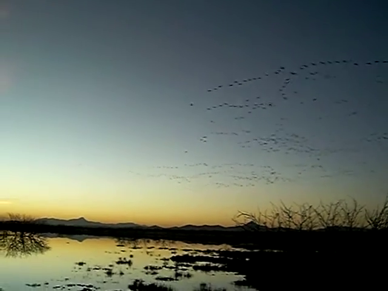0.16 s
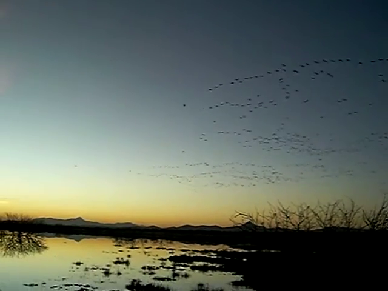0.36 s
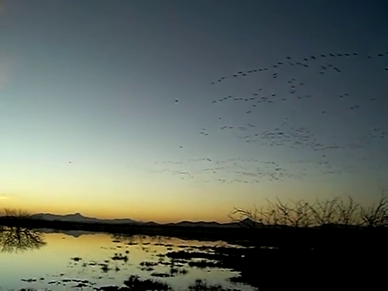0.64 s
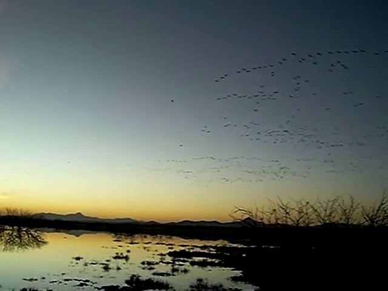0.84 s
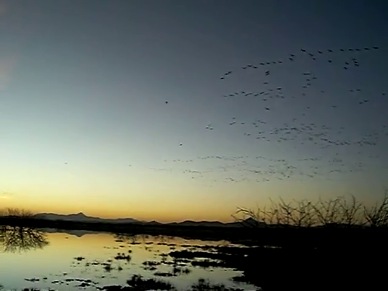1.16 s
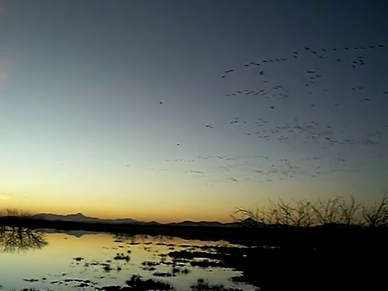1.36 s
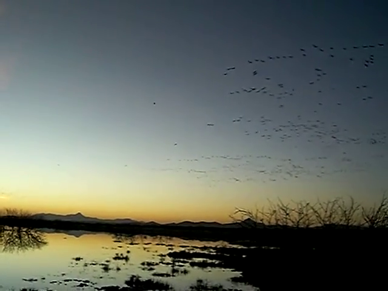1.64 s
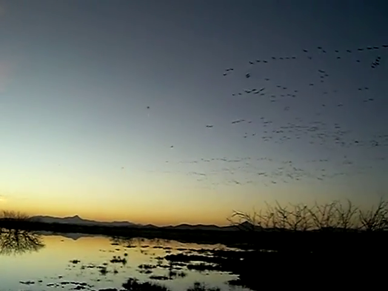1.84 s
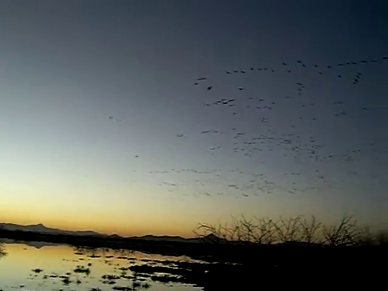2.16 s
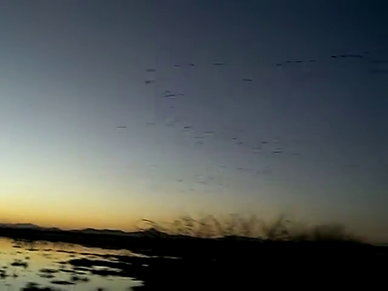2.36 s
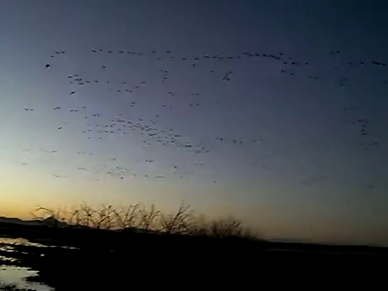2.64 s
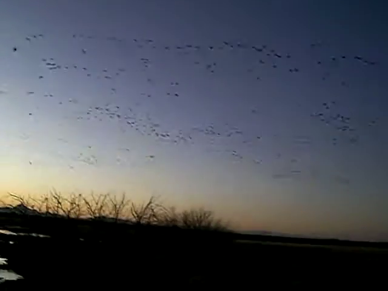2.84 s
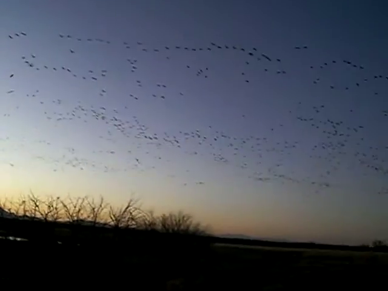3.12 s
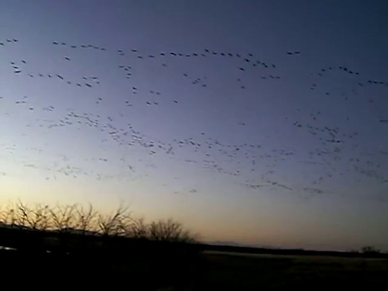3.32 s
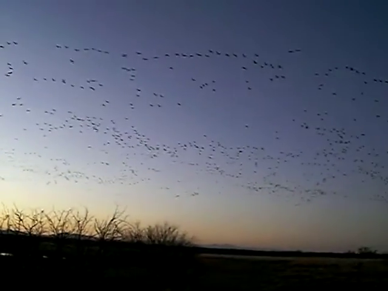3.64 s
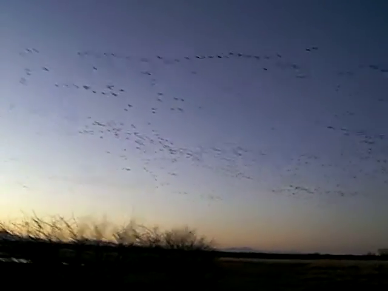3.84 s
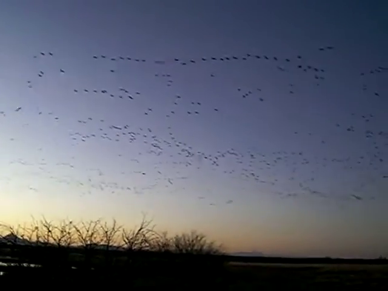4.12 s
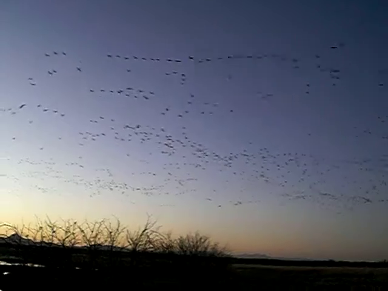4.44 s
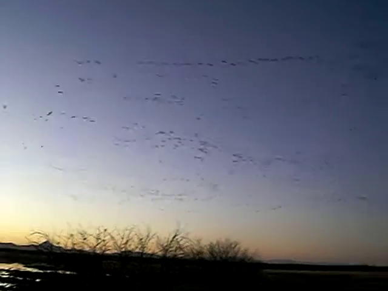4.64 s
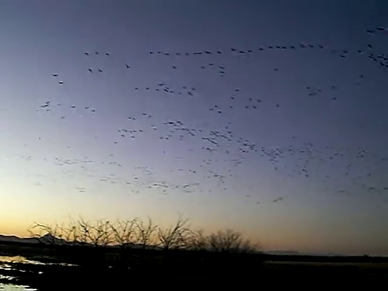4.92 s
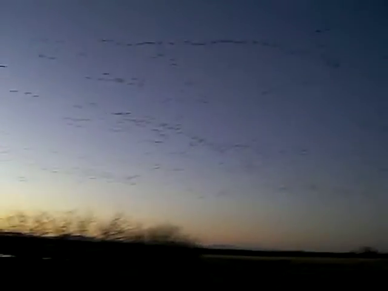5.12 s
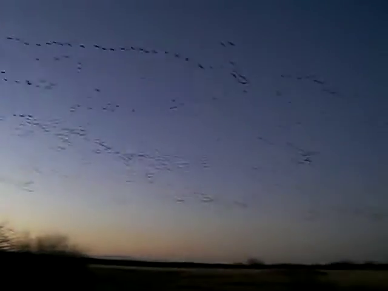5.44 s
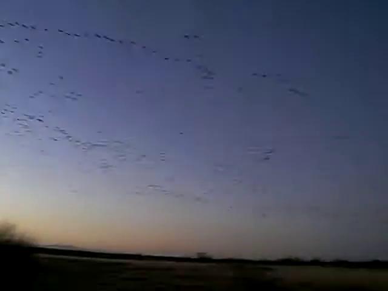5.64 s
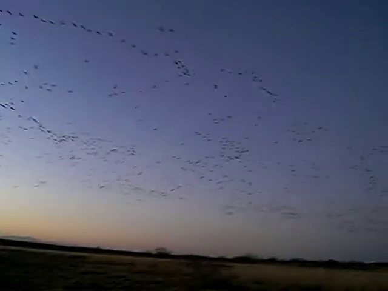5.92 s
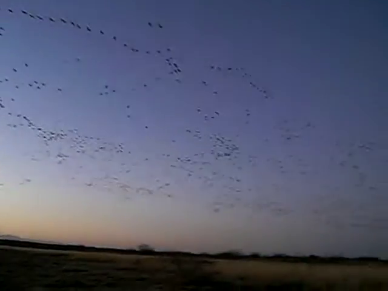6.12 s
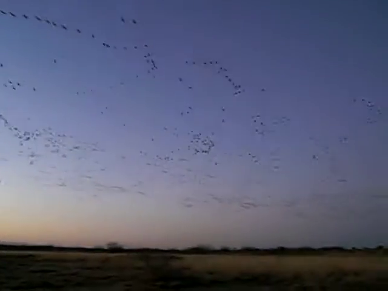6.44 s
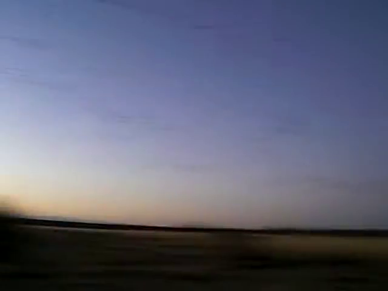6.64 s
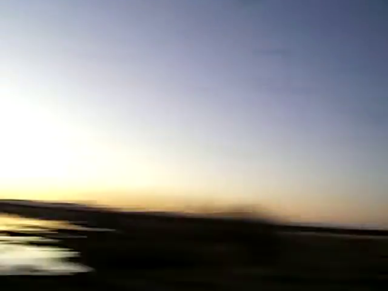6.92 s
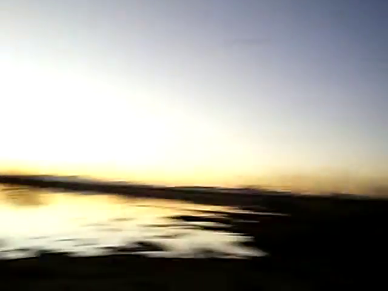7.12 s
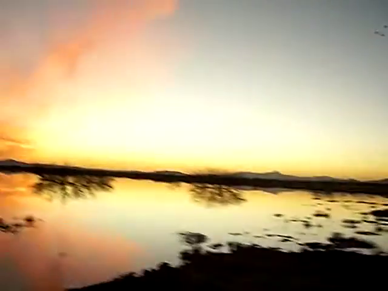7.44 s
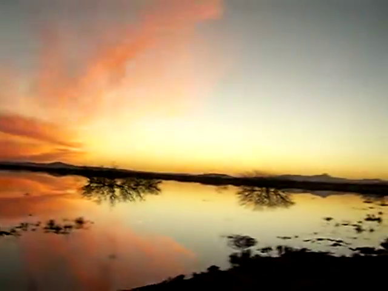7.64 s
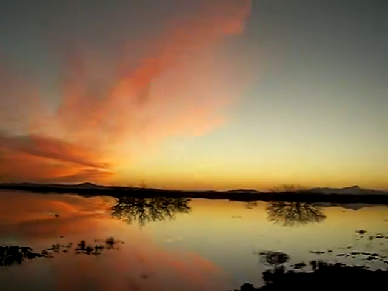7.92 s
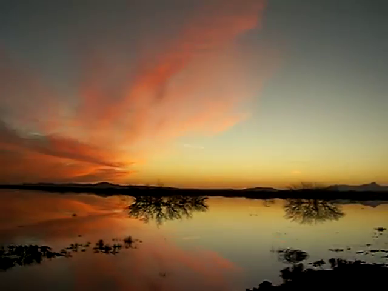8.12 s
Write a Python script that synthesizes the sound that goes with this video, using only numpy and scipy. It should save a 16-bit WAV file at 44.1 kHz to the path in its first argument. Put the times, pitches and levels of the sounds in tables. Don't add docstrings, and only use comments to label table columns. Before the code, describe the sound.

Dense, unbroken bird clamour in open air with no echo: mid-pitched rolling bugles and honks overlapping at many distances, gently swelling and brightening. Single calls rise just above the mass. A small mono handheld microphone lends faint fizz, low rumble and a thin high whine. Late on, fingers rub its case, click sharply once and bump it several times.

```python
import sys
import numpy as np
from scipy import signal
from scipy.fft import rfft, irfft, next_fast_len
from scipy.io import wavfile
from scipy.ndimage import uniform_filter1d, map_coordinates

SR = 44100
rng = np.random.default_rng(int(sys.argv[2]) if len(sys.argv) > 2 else 0)


def linear_from_db(decibels):
    return 10 ** (np.asarray(decibels, float) / 20)


def unload_audio(sound):
    columns = np.transpose(np.atleast_2d(sound))
    steps = np.round(np.clip(columns, -1, 1) * 32767)
    wavfile.write(sys.argv[1], SR, steps.astype(np.int16))


N = 364707

# f/Hz, level/dB per Hz
HISS_COLOUR = [(3500, -6), (6000, -2), (7400, -1.5), (8800, -2), (10200, -1.5), (11800, -3), (13000, -2),
               (14700, -1), (15700, -2)]
# f/Hz, level/dB per Hz
RUMBLE_COLOUR = [(12, -42), (20, -4.5), (43, -19), (62, -8.5), (103, -2.5), (135, -7), (323, -10),
                 (520, -5.5), (680, -27.5), (1140, -120)]
# f/Hz, width/Hz, depth/0-1
PORT_HOLLOWS = [(4730, 260, .8), (7900, 200, .6), (9380, 350, .55), (14100, 200, .5)]
# t/s, level/dB
TICKS = [
    (.0272, -56),
    (.0338, -55),
]
# f/Hz, level/dB, t60/s
TICK_RING = [
    (14130, 5, 0.007),
    (10830, -5, 0.005),
]
# t/s, peak level/dB, direction/+-1, ring f/Hz, width/s
KNOCKS = [(0.404, -40, 1, 302, 0.0013), (2.0722, -39, 1, 330, 0.0021), (4.725, -48, 1, 300, .003),
          (5.369, -42, -1, 129, 0.0042), (6.331, -45, 1, 199, 0.0021), (6.638, -30, 1, 340, 0.0029),
          (6.853, -44, -1, 89, .005), (6.96, -52, 1, 6800, .001), (7.083, -32, -1, 150, 0.0014),
          (7.084, -46, 1, 6500, .0012), (7.304, -19, 1, 60, 0.0011), (7.598, -36, 1, 60, 0.002),
          (7.6315, -22, 1, 60, 0.00092), (7.827, -34, 1, 60, 0.003), (7.847, -32.5, -1, 60, 0.00087)]
# t/s, level/dB, rise/s, t60/s
RUBS = [(4.7255, -46, .001, 0.011), (5.735, -52.5, .015, 0.12), (6.04, -55, 0.044, .15),
        (6.2, -65, .03, .15), (6.606, -44.5, .004, 0.03), (6.634, -55, .002, 0.0154),
        (6.772, -51, .006, .03), (6.232, -50, .002, .02), (6.853, -47, .002, .02), (6.942, -49, .002, .02),
        (7.024, -45, .007, 0.034), (7.082, -52, .001, .015)]
# t/s, level/dB, tail level/dB, tail t60/s
CLICK = (6.844, 1.5, -25, .01)
# f/Hz, level/dB per Hz
CASE_COLOUR = [(2500, -22), (4000, -8), (6000, -3), (8300, 0), (10000, -4), (11800, 1), (13500, -4),
               (15400, 3), (17000, -2)]
# t/s, highest pitch f/Hz
KEENEST = [(0, 1460), (1.6, 1450), (2.2, 1386), (3.3, 1360), (4.3, 1332), (4.9, 1453), (6.2, 1401),
           (6.9, 1240), (7.5, 1180), (8.27, 1278)]
# t/s, level/dB, nearness/dB gained at the bright edge
DIN_SWELL = [(0, -24, 1), (1.01, -25, 0), (1.5, -24, 2), (1.91, -25, 0), (2.3, -25, 1.5), (2.6, -22.5, 1),
             (2.85, -24, -0.5), (3.27, -23, 0), (3.62, -23.5, -2), (4.03, -22, 0), (4.3, -24.5, 1.5),
             (5.0, -22.5, 1.5), (5.5, -23.5, -2.5), (6.2, -23, 0.5), (6.5, -25, -2.5), (6.96, -24.5, 2),
             (7.56, -26, -0.5), (8.27, -25.5, -1)]
# t/s, length/s, pitch f/Hz, level/dB over the din, favoured overtone
ROLLING_CALLS = [(0, 0.226, 1260, 1.5, 1), (0, .131, 1427, 3, 1), (.373, 0.3, 1387, -6, 1),
                 (.395, 0.092, 762, -2.5, 1), (.638, 0.19, 1355, 7, 1.53), (.25, .2, 831, -4, 1),
                 (1.312, 0.26, 989, 0.5, 2), (1.435, .356, 1362, -2, 1), (2.428, 0.16, 788, -1.5, 2),
                 (2.598, .304, 839, -11, 1), (2.751, 0.096, 1500, 1, 1), (2.867, 0.108, 856, -5, 1),
                 (3.095, 0.061, 1180, 4.5, 1), (3.097, 0.132, 1109, -1.5, 1), (3.518, 0.085, 1132, -5, 1),
                 (3.742, 0.135, 1422, -2.5, 1), (3.822, 0.105, 845, -1, 2), (4.65, 0.155, 1366, 1, 1),
                 (4.975, 0.238, 1281, 1, 1), (5.519, 0.25, 1225, -2, 1), (6.153, .311, 1200, -4, 1),
                 (6.2, 0.087, 1222, 3, 1), (6.332, .12, 1243, 1, 2), (6.829, 0.243, 842, 1.5, 2)]
# t/s, length/s, pitch f/Hz, level/dB over the din
FACING_CALLS = [(.103, .105, 1304, -2), (1.021, 0.196, 1325, 2), (1.494, .15, 1199, -1),
                (1.694, 0.17, 1312, 3), (1.78, .111, 1120, 5), (2.304, 0.234, 999, -7),
                (2.342, .167, 1267, -2.5), (2.469, .333, 1172, -2), (3.131, .179, 1317, 1),
                (3.9, .14, 1071, -2.4), (4.023, .127, 744, -8), (4.11, 0.077, 1047, 2),
                (4.341, 0.082, 1160, -9), (4.405, 0.133, 1095, 2), (4.634, 0.095, 1176, -5),
                (4.699, .317, 1277, -2.8), (4.836, 0.044, 1457, 6), (4.877, 0.092, 1122, -3),
                (4.926, 0.11, 1136, -2), (5.039, 0.14, 1315, 2), (5.058, .138, 951, 7),
                (5.328, 0.134, 1411, 2), (5.928, 0.158, 1098, 1), (6.027, 0.12, 1481, 3),
                (6.776, 0.072, 1063, 1), (7.163, .174, 906, 2), (7.205, .136, 1138, -5),
                (8.212, .111, 774, 5)]
# t/s, length/s, pitch f/Hz, level/dB over the din, favoured overtone
SMOOTH_HONKS = [(.456, 0.19, 1156, -1, 3), (1.335, 0.14, 1011, -3, 1.8), (1.435, 0.15, 1020, 4, 2),
                (1.59, .22, 1375, -8, 4), (1.82, 0.088, 1130, -2, 5), (3.377, 0.16, 790, 1.5, 2),
                (3.729, 0.089, 900, 2, 5), (3.84, 0.14, 870, 1.5, 2), (3.845, .15, 1135, -2.5, 5),
                (3.97, .14, 860, 1, 2), (4.1, 0.12, 870, 3.5, 2), (4.42, .11, 822, -3, 1.04),
                (4.9, 0.122, 1040, 3, 5), (5.155, .26, 765, -5.6, 2), (5.867, 0.21, 1360, 0, 2),
                (5.941, 0.078, 1285, -6, 1), (6.088, 0.48, 1312, -6, 2), (6.116, 0.17, 1185, 2.5, 1),
                (6.099, 0.095, 610, -4.5, 1), (6.284, .072, 1065, 7.5, 2), (6.499, 0.12, 885, 3, 2),
                (6.796, 0.11, 660, 1.5, 1), (6.876, 0.089, 772, -6, 5), (7.19, 0.085, 1150, 2, 2),
                (7.28, 0.047, 1158, 5, 2)]
# f/Hz, level/dB per Hz
VOICE_COLOUR = [(260, -51.5), (450, -32), (524, -27), (641, -13.5), (712, -12.5), (820, 0.5), (1140, -2.5),
                (1510, -21), (2200, -23.5), (2450, -23), (3140, -32.5), (4070, -35), (4740, -42),
                (5270, -40.5), (7500, -54), (9750, -83), (16500, -120)]


def unit(x):
    return x / np.sqrt(np.mean(x ** 2) + 1e-20)


def filtered(x, response):
    size = next_fast_len(N + 8192)
    spectrum = rfft(x, size) * response(np.fft.rfftfreq(size, 1 / SR))
    return irfft(spectrum, size)[..., :N]


def colour(points):
    f, db = np.transpose(points)
    return lambda hz: linear_from_db(np.interp(np.log(hz + 1), np.log(f + 1), db))


def noise(response):
    return filtered(rng.standard_normal(N), response)


def wobble(rate, size=N):
    knots = rng.standard_normal(int(size * rate / SR) + 4)
    return map_coordinates(knots, [np.arange(size) * rate / SR], order=1)


def add(track, s, sound):
    part = track[round(s * SR):][:len(sound)]
    part += sound[:len(part)]


def hiss(sound):
    step = unit(uniform_filter1d(abs(sound), size=70))
    fizz = linear_from_db(-56.5) * unit((0.37 + step ** 0.8) * noise(colour(HISS_COLOUR)))
    rumble_level = linear_from_db(-58.5 + 0.99 * wobble(5.5))
    return fizz + rumble_level * unit(noise(colour(RUMBLE_COLOUR)))


def electronics():
    t = np.arange(N) / SR
    cycle_s, attack_s, whine_hz = .04, .0004, 15734.3
    ticks = np.zeros(N)
    for s, db in TICKS:
        age = (t - s) % cycle_s
        for hz, ring_db, t60 in TICK_RING:
            ring = linear_from_db(db + ring_db - 60 * age / t60) * np.sin(2 * np.pi * hz * age)
            ticks += ring * (1 - np.exp(-age / attack_s))
    return ticks + linear_from_db(-62.0) * np.sin(2 * np.pi * whine_hz * t)


def knocks():
    t = np.arange(-SR // 20, SR // 5) / SR
    pushes = np.zeros(N)
    for s, db, way, hz, width in KNOCKS:
        push = np.exp(-(t / width) ** 2) * np.cos(2 * np.pi * hz * t)
        add(pushes, s + t[0], way * linear_from_db(db) * push)
    return filtered(pushes, lambda hz: 1j * hz / (30 + 1j * hz))


def fingers():
    t = np.arange(-SR // 20, SR // 5) / SR
    rubs = np.zeros(N)
    for s, db, rise, t60 in RUBS:
        burst = np.where(t < 0, np.exp(-(t / rise) ** 2), linear_from_db(-60 * abs(t) / t60))
        add(rubs, s + t[0], linear_from_db(db) * burst)
    click_s, click_db, tail_db, tail_t60 = CLICK
    add(rubs, click_s, linear_from_db(tail_db - 60 * t[t >= 0] / tail_t60))
    scratch = unit(noise(colour(CASE_COLOUR)))
    strike = np.arange(N) == round(click_s * SR)
    return rubs * scratch + linear_from_db(click_db) * filtered(strike, colour(CASE_COLOUR))


def call(length, hz, end_hz, rattle, beak_hz, jitter, sharp):
    t = np.arange(int(length * SR)) / SR
    beat = np.sin(np.pi * rattle * t) ** 2 if rattle else np.ones(len(t))
    sag = .012 * (beat - 1)
    pitch = (hz + (end_hz - hz) * t / length) * (1 + sag + jitter * wobble(90, size=len(t)))
    half = np.pi * np.cumsum(pitch) / SR
    count = 7400 // max(hz, end_hz)
    overtones = np.sin((2 * count + 1) * half) / (2 * np.sin(half) + 1e-9) - .5
    favoured = signal.lfilter(*signal.iirpeak(beak_hz, 2.5, SR), overtones)
    fade = 1.2 * np.sqrt(abs(np.sin(np.pi * t / length)))
    return (.4 * overtones + 2 * favoured) * unit(beat ** sharp) * fade


def far_birds(count):
    lowest_hz = 578.4
    din = np.zeros(N + SR)
    for n in range(count):
        u, g = rng.random(6), rng.standard_normal(2)
        s = (n + u[0]) / count * (N / SR + .5)
        highest_hz = np.interp(s - .4, *np.transpose(KEENEST))
        hz = lowest_hz + (highest_hz - lowest_hz) * u[1]
        end_hz = hz * (.975 + .03 * g[0])
        length = .06 + .18 * u[2]
        rattle = (21 + 11 * u[3]) * (u[4] < .93)
        beak_hz = 1100 * 7.77 ** u[5]
        voice = call(length, hz, end_hz, rattle, beak_hz, jitter=.009, sharp=2)
        add(din, s, linear_from_db(1.73 * g[1]) * voice)
    return unit(din[SR // 2:][:N])


def swelling_din():
    blur = unit(noise(lambda hz: 1 / (1 + (hz / 5500) ** 2)))
    din = unit(far_birds(count=1100) + .85 * blur)
    s, loud_db, near_db = np.transpose(DIN_SWELL)
    swelling = np.zeros(N)
    for lo, hi, share in [(0, 1480, 0), (1480, 3000, 0.15), (3000, SR, 1)]:
        swell_db = np.interp(np.arange(N) / SR, s, loud_db - loud_db.mean() + share * near_db)
        swelling += linear_from_db(swell_db) * filtered(din, lambda hz: (hz >= lo) & (hz < hi))
    return swelling


def near_birds():
    beats_per_s, sag_per_s, honk_sinks = 25.5, .08, .04
    facing_beak_hz, hoarse = 4500, .014
    near = np.zeros(N)
    rolls = [(s, length, hz, db, k * hz, hoarse / 3) for s, length, hz, db, k in ROLLING_CALLS]
    rolls += [(*row, facing_beak_hz, hoarse) for row in FACING_CALLS]
    for s, length, hz, db, beak_hz, jitter in rolls:
        rattle = max(2, np.round(length * beats_per_s)) / length
        end_hz = hz * (1 - sag_per_s * length)
        add(near, s, linear_from_db(db) * call(length, hz, end_hz, rattle, beak_hz, jitter, sharp=1.8))
    for s, length, hz, db, k in SMOOTH_HONKS:
        end_hz = hz * (1 - honk_sinks)
        add(near, s, linear_from_db(db) * call(length, hz, end_hz, 0, k * hz, jitter=.004, sharp=1))
    return near


def flock():
    birds = linear_from_db(1.0) * swelling_din() + linear_from_db(-18) * near_birds()
    return linear_from_db(-22.5) * unit(filtered(birds, colour(VOICE_COLOUR)))


def sound_port(hz):
    hollows = [1 - depth / (1 + 1j * (hz - centre) / (width / 2)) for centre, width, depth in PORT_HOLLOWS]
    return np.prod(hollows, axis=0)


def scene():
    sound = flock() + knocks() + fingers()
    return (filtered(sound + hiss(sound), sound_port) + electronics())[None]


def band_limit(x):
    return signal.sosfilt(signal.butter(12, 15752, fs=SR, output="sos"), x)


def record(dry):
    return band_limit(dry)


dry = scene()
out = record(dry)
unload_audio(out)
```